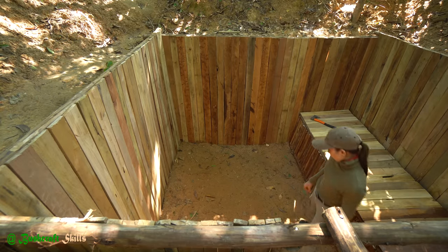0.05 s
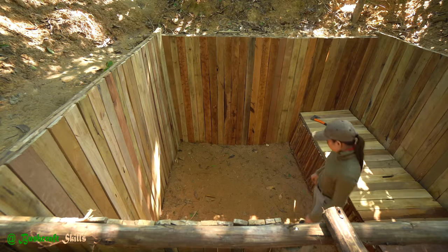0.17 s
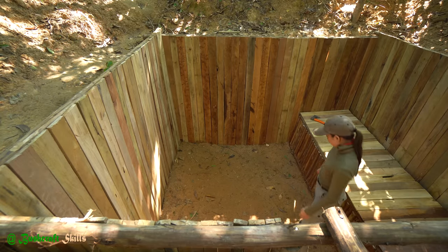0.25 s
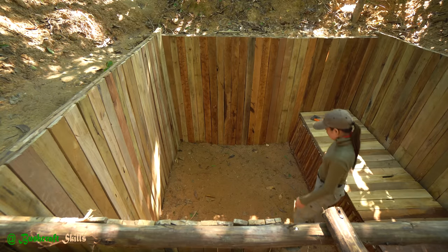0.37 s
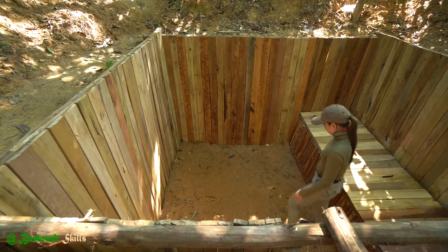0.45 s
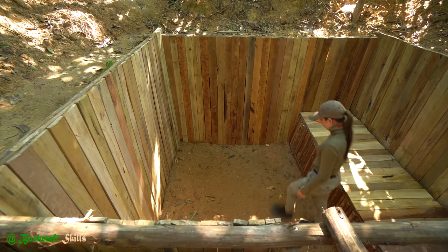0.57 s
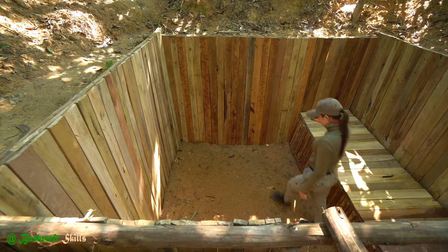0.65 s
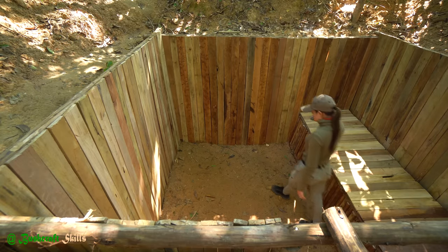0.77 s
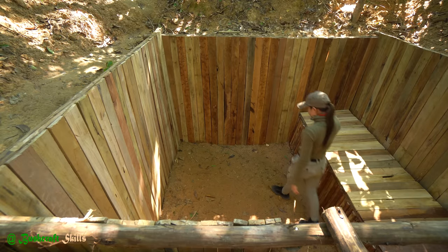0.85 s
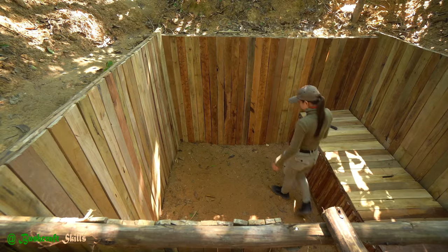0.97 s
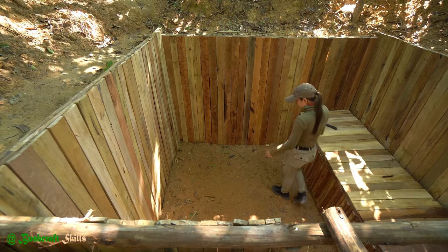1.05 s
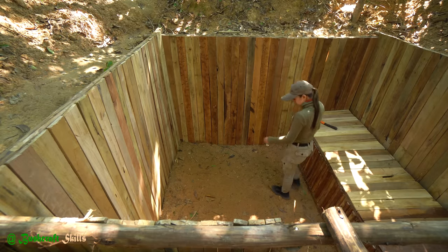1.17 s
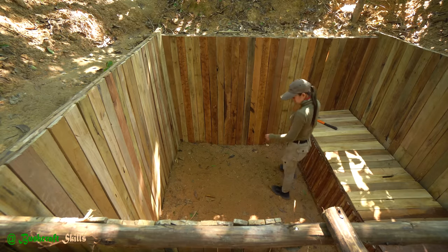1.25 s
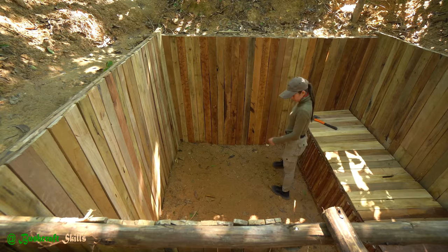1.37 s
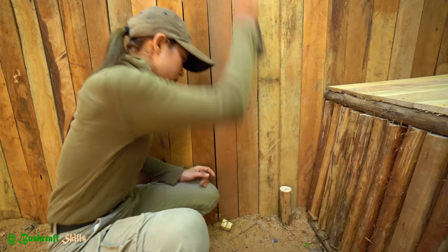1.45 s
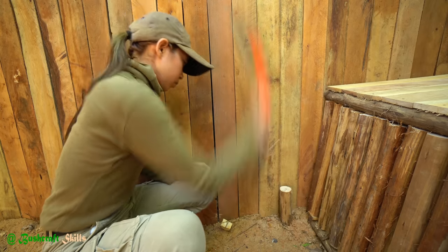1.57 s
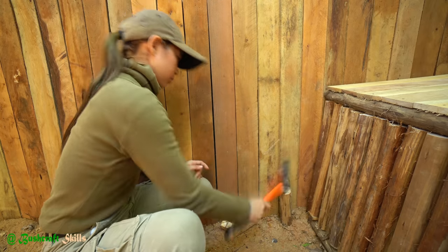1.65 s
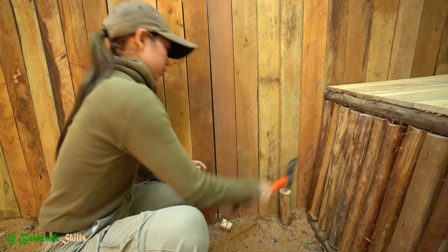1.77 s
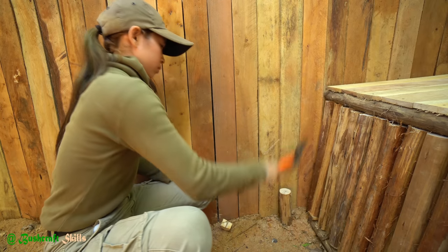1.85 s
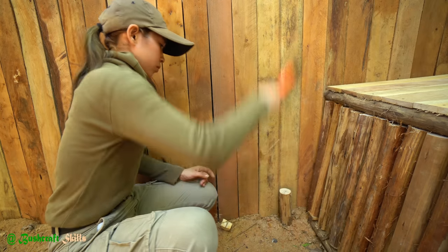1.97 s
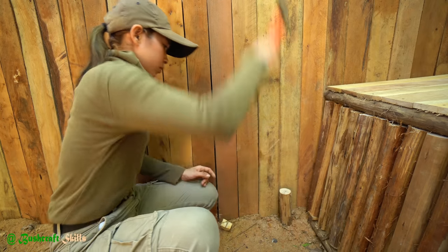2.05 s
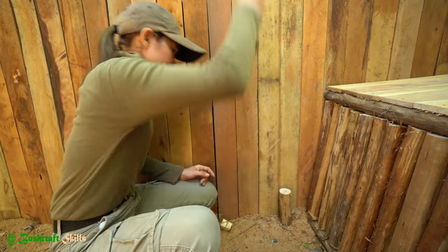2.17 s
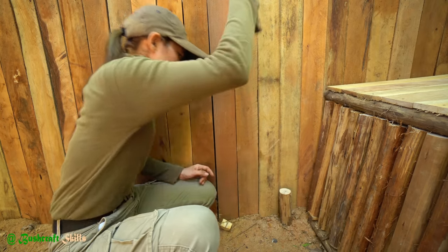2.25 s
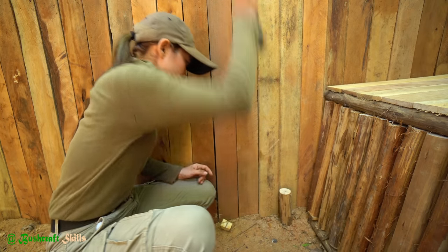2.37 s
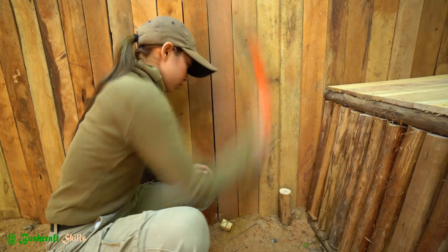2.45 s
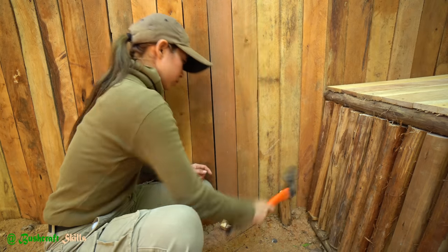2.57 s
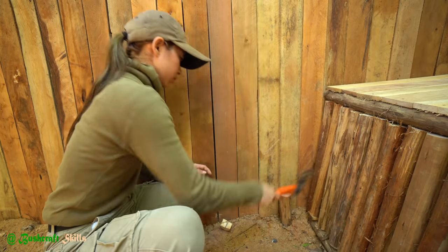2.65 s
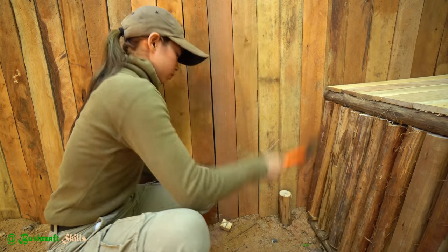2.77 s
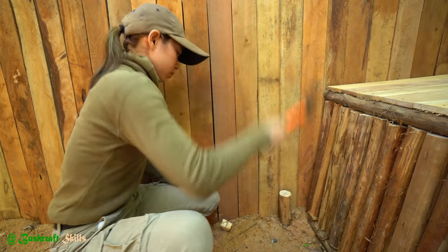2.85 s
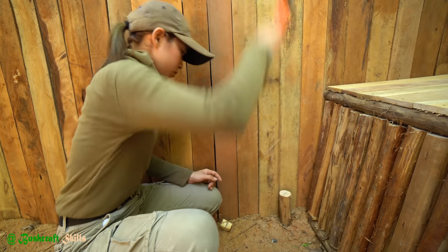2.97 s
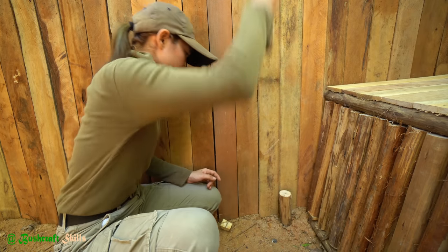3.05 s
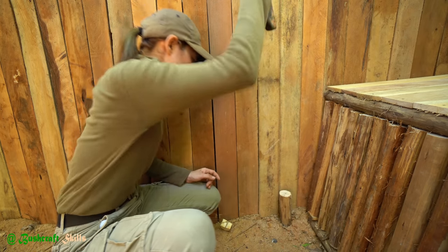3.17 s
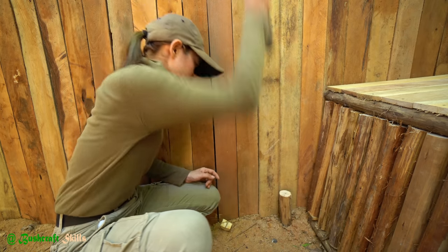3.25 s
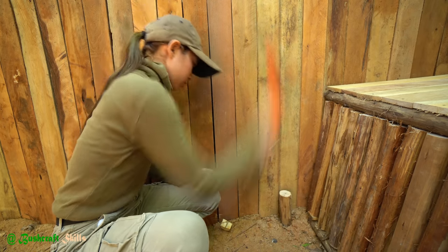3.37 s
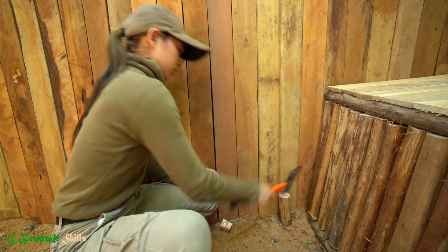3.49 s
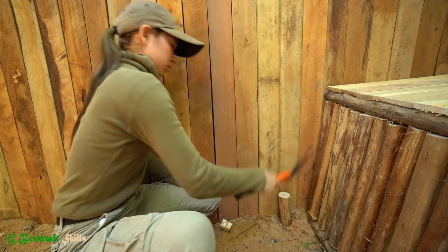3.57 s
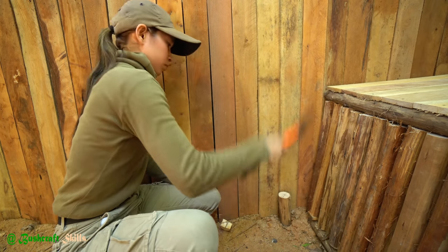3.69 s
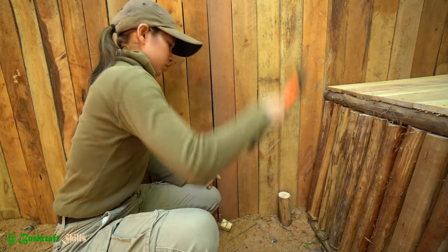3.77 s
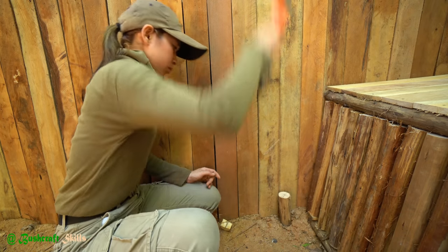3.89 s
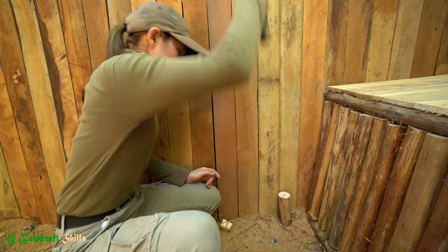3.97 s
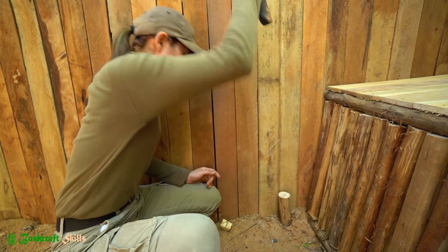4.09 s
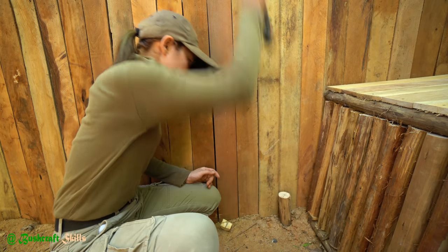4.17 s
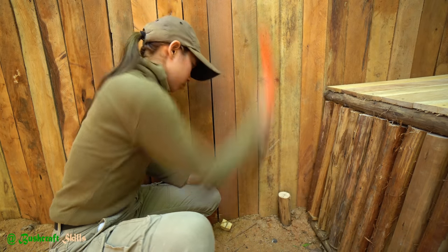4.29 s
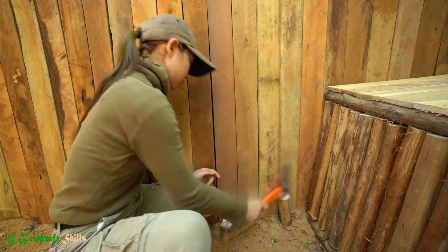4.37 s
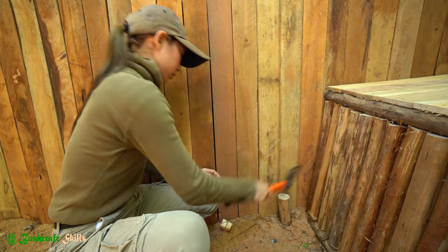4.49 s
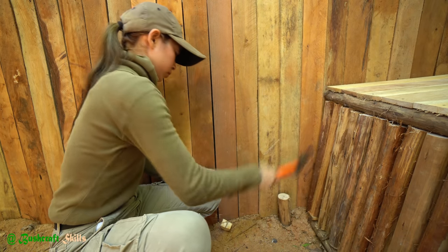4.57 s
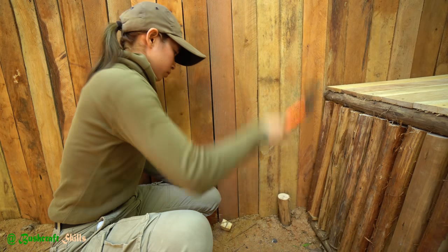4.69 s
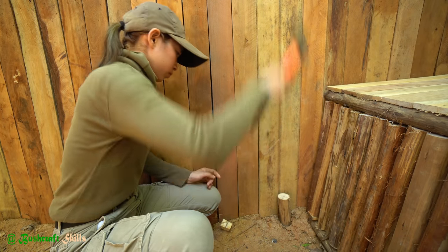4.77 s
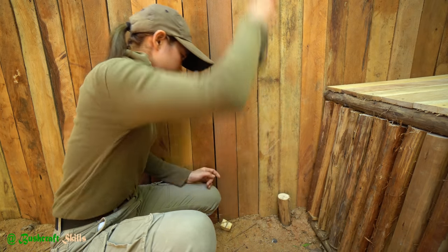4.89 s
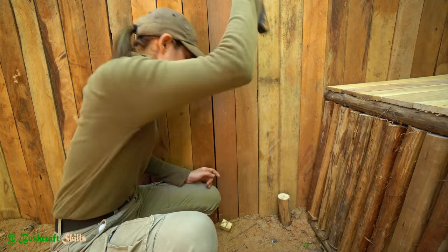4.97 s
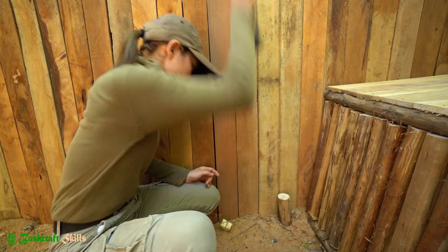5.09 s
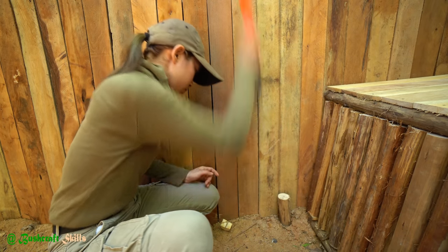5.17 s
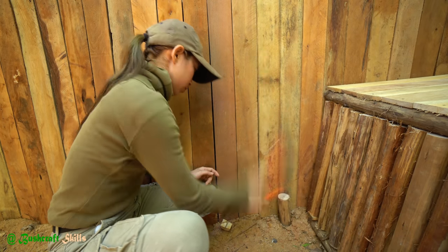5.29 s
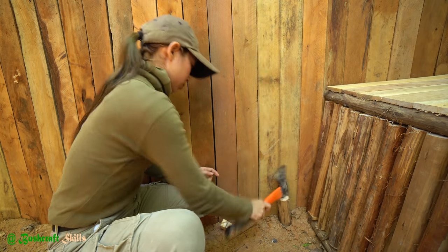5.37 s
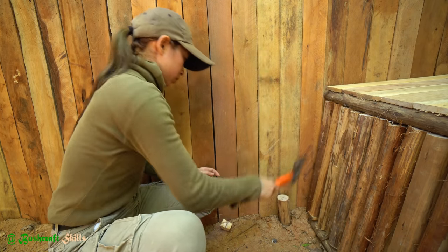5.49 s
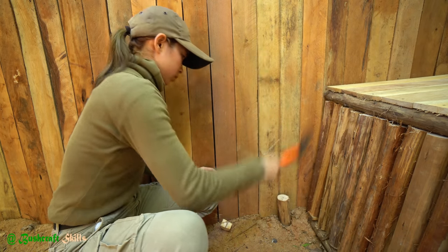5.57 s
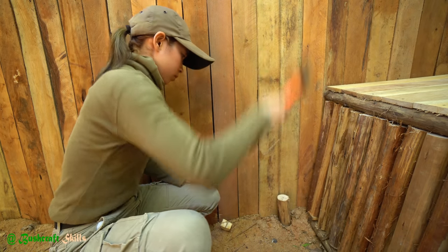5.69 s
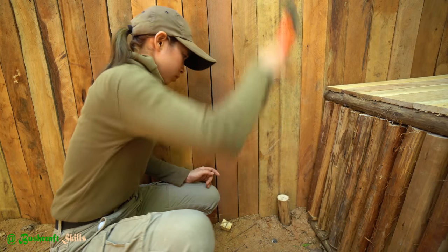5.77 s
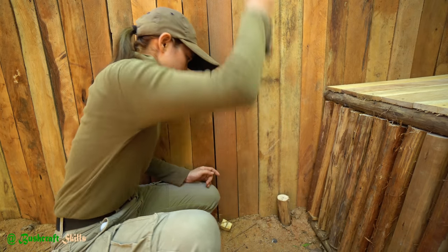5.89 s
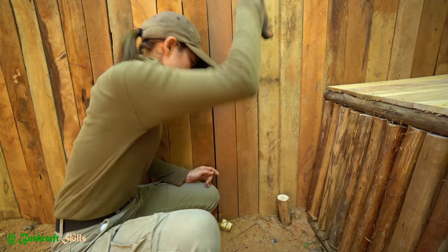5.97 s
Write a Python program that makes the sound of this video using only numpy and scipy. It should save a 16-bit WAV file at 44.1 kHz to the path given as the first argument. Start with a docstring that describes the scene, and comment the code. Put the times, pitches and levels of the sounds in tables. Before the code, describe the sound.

Shrill insects hiss steadily over faint rumbling air. A loose piece of wood clatters briefly, clothes brush and a few steps crunch on gritty earth. Then, closer inside a plank-lined pit, a steel hammer strikes a wooden stake five times, just under a second apart. Each blow cracks, thuds in the ground and gathers short dense wooden reflections; the last ones are followed by a dull rebound knock and low boom.

```python
"""Insects hiss over rumbling air (shaped noise), first from above a plank-lined forest pit, then from inside it.
A loose piece of wood is knocked (ringing modes, scrapes); clothes brush and feet crunch on earth (noise strokes).
Then a steel hammer drives a wooden stake in five blows: a short crack (swing and noise), a swell of reflections
from the plank walls (decaying noise), and a thud through ground and planks. A seated stake cracks higher and
weaker with duller reflections; after the last three blows the head falls back with a knock and a low boom."""
import sys
import numpy as np
from scipy import signal
from scipy.fft import rfft, irfft, next_fast_len
from scipy.io import wavfile
from scipy.ndimage import uniform_filter1d, map_coordinates

SR = 44100
rng = np.random.default_rng(int(sys.argv[2]) if len(sys.argv) > 2 else 0)


def dump_mix(stems):
    """Bounce the given channels to the path in sys.argv[1] as a 16-bit WAV at rate SR."""
    frames = np.atleast_2d(stems).T  # one column per channel
    limited = np.clip(frames, -1, 1)  # hard clip at full scale
    pcm = np.round(limited * 32767).astype(np.int16)
    wavfile.write(sys.argv[1], SR, pcm)


N = 265923

TIME = np.arange(N) / SR  # s
AGE = np.arange(int(.8 * SR)) / SR  # s since the start of one event
# Colour of wood and walls with the stake seated. Each row: frequency in Hz, relative density in dB.
SEATED_COLOUR = [(150, -27.5), (250, -4), (319, -9.5), (429, -9.5), (547, -8.5), (761, -6.5), (906, -11.5),
                 (1330, -10.5), (1900, -12), (2860, -11), (5350, -26), (6940, -27.5), (7310, -27.5),
                 (13000, -35), (16000, -44.5)]
# Likeness of the ears for hammer sounds. Each row: frequency in Hz, left-right correlation.
PIT_ALIKE = [(60, 1), (290, 1), (640, 0.86), (1400, 0.47), (3000, .3), (7000, 0.036), (15000, 0.18)]
# Likeness of the ears for air, insects and rubbing. Each row: frequency in Hz, left-right correlation.
OPEN_ALIKE = [(60, 1), (200, 0.8), (600, 0.21), (2000, 0.4), (8000, .1), (14000, 0.24)]


def amp(db):
    """Decibels to gain."""
    return 10 ** (np.asarray(db) / 20)


def unit(x):
    """Scale to rms 1."""
    return x / np.sqrt(np.mean(x ** 2) + 1e-20)


def along(points, hz):
    """Interpolate (Hz, value) points on a log frequency axis."""
    f, v = np.transpose(points)
    return np.interp(np.log(hz + 1), np.log(f + 1), v)


def curve(rows, t):
    """Interpolate (s, value) rows linearly."""
    return np.interp(t, *np.transpose(rows))


def add(out, s, x):
    """Mix x into out from time s on."""
    start = max(0, round(s * SR))
    out[:, start:start + x.shape[-1]] += x[..., :N - start]


def patches(size, count):
    """Smooth random curve of rms 1 with count steps along its length."""
    return unit(map_coordinates(rng.standard_normal(count + 1), [np.arange(size) * count / size]))


def noise(colour_db, alike, size):
    """Stereo noise of rms 1; the mid-side balance per frequency sets the left-right correlation."""
    hz = np.fft.rfftfreq(size, 1 / SR)
    turn = np.arccos(np.clip(along(alike, hz), -1, 1)) / 2
    spectra = rfft(rng.standard_normal((2, size))) * amp(colour_db(hz))
    mid, side = irfft(spectra * [np.cos(turn), np.sin(turn)], size)
    return unit(np.array([mid + side, mid - side]))


def ring(modes, attack_s, hold_s, spread_rad, sag=0., waver_rad=0.):
    """Modes build up, are fed for hold_s and die; they start sharp by the share sag and sink."""
    hz, db, t60_s = np.transpose(modes)[:, :, None]
    phase = rng.uniform(0, 2 * np.pi, hz.shape)
    phase = phase + spread_rad * rng.standard_normal((2, *hz.shape))  # scatter between the ears
    drift = np.array([map_coordinates(rng.standard_normal(40), [AGE * 40]) for _ in hz])
    clock_s = AGE + sag * 0.0815 * (1 - np.exp(-AGE / 0.081))
    scatter_db = 0.61 * rng.standard_normal(hz.shape)
    level = amp(db + scatter_db - 60 * np.maximum(AGE - hold_s, 0) / t60_s)
    waves = level * np.sin(2 * np.pi * hz * clock_s + phase + waver_rad * drift)
    return waves.sum(axis=1) * (1 - np.exp(-AGE / attack_s))


def forest():
    """Insects, each singer on a narrow pitch amid a crowd, over rumbling air; both are quieter inside the pit."""
    # Insect crowd. Each row: frequency in Hz, relative density in dB.
    crowd_colour = [(4710, -54), (8000, -51), (8680, -20.5), (8830, -13), (9360, -10), (11600, -4.5),
                    (11800, -4.5), (12200, 1.5), (12400, -7.5), (12900, -0.5), (14700, -2.5), (15300, -2),
                    (16000, -19.5)]
    # Single singers. Each row: centre in Hz, width in Hz, relative level in dB.
    singers = [(9100, 75, -17.5), (9750, 80, -19), (11700, 50, -13.5), (12400, 110, -5.5),
               (12500, 30, -4.5), (12762, 25, -6), (12800, 25, -3.5), (13060, 35, -8), (13308, 25, -3),
               (13430, 55, -6), (13570, 35, -3), (13862, 25, -6.5), (14140, 30, -4.5), (14270, 70, -3),
               (14725, 90, -12), (15420, 70, -15.5)]
    # Air above the pit. Each row: frequency in Hz, relative density in dB.
    above_colour = [(15, -54), (25, -37), (52, 1.5), (108, 2.5), (527, -13.5), (2070, -16.5), (5620, -20),
                    (6190, -18.5), (8500, -18.5), (11000, -56), (18700, -120)]
    # Air inside the pit. Each row: frequency in Hz, relative density in dB.
    inside_colour = [(15, -29.5), (25, -12), (89, -2), (113, -9.5), (172, -14), (189, -16.5), (375, -18),
                     (403, -16.5), (798, -21.5), (1970, -21), (4730, -23), (8500, -28), (11000, -56),
                     (18700, -120)]
    inside_from_s = 1.443
    above, inside_s = TIME < inside_from_s, TIME - inside_from_s

    def bands_db(hz):
        power = 0
        for centre_hz, width_hz, db in singers:
            detune = 2 * (hz - centre_hz) / width_hz
            power = power + amp(db) ** 2 / width_hz / (1 + detune ** 2) ** 2
        return 10 * np.log10(power)

    crowd = noise(lambda hz: along(crowd_colour, hz) + 4.2 * patches(len(hz), count=450), OPEN_ALIKE, N)
    chorus = amp(-1.0) * crowd + amp(-2.5) * noise(bands_db, OPEN_ALIKE, N)
    buzz = amp(.7 * patches(N, count=1200))  # fast flicker
    # slopes in dB per s
    chorus_db = np.where(above, -40 + 1.6 * TIME, -43.5 - 0.52 * inside_s)
    air_above = amp(-52.5) * noise(lambda hz: along(above_colour, hz), OPEN_ALIKE, N)
    air_inside = amp(-53.5 - 2.04 * inside_s) * noise(lambda hz: along(inside_colour, hz), OPEN_ALIKE, N)
    insects = amp(chorus_db) * buzz * chorus * amp([[.55], [-.55]])  # leans left
    return insects + np.where(above, air_above, air_inside)


def scuff(rise_s, t60_s, grit_db):
    """One rubbing stroke: a soft rush with bright grains on it."""
    # Soft rush. Each row: frequency in Hz, relative density in dB.
    soil_colour = [(60, -5), (250, 1.5), (500, -4), (1200, -1), (2500, -1.5), (4500, -6), (8000, -15.5),
                   (16000, -23)]
    # Bright grains. Each row: frequency in Hz, relative density in dB.
    grit_colour = [(500, -33), (2500, -3.5), (5000, -0.5), (9000, -0.5), (13000, 2), (16000, -21)]
    soil = noise(lambda hz: along(soil_colour, hz), OPEN_ALIKE, len(AGE))
    grains = amp(1.8 * unit(uniform_filter1d(rng.standard_normal(len(AGE)), size=60)))
    grit = unit(grains * noise(lambda hz: along(grit_colour, hz), OPEN_ALIKE, len(AGE)))
    stroke = np.minimum(AGE / rise_s, 1) * amp(-60 * np.maximum(AGE - rise_s, 0) / t60_s)
    return stroke * (soil + amp(grit_db) * grit)


def loose_wood():
    """A loose piece of wood rings in its modes and scrapes at each knock."""
    # Wood modes. Each row: frequency in Hz, level in dB, t60 in seconds.
    wood_modes = [(886, -2, .13), (925, 0, .11), (1991, -4, .15), (2124, -9, .12), (3390, -10, .09)]
    # Knocks. Each row: start in seconds, ring in dB, scrape in dB, scrape t60 in seconds, pitch ratio.
    taps = [(0.001, -43, -45, 0.83, 0.94), (0.074, -36, -41.5, 0.33, 1), (0.094, -34.5, -32, 0.19, 1),
            (0.152, -50, -39, .19, 0.98)]
    out = np.zeros((2, N))
    for s, ring_db, scrape_db, t60_s, pitch in taps:
        modes = np.multiply(wood_modes, [pitch, 1, 1])
        tone = ring(modes, attack_s=0.00135, hold_s=0.0032, spread_rad=0.35)
        add(out, s, amp(ring_db) * tone * amp([[-1.2], [1.2]]))  # leans right
        add(out, s, amp(scrape_db) * scuff(rise_s=0.0047, t60_s=t60_s, grit_db=-5.5))
    return out


def clothes():
    """Cloth brushes softly as the body moves; a slow brush also fades slowly."""
    # Brushes. Each row: start in seconds, level in dB, rise in seconds.
    rustles = [(0.341, -52, 0.048), (0.96, -48.5, 0.023), (1.384, -47, .01), (1.465, -46.5, 0.0074),
               (1.57, -53.5, .03), (2.28, -57, 0.033), (4.181, -62.5, 0.01), (5.11, -54.5, 0.046)]
    out = np.zeros((2, N))
    for s, db, rise_s in rustles:
        add(out, s, amp(db) * scuff(rise_s, t60_s=.35 + 9 * rise_s, grit_db=-16.5))
    return out


def footsteps():
    """The heel crunches into gritty soil, then the sole rolls down."""
    # Steps. Each row: start in seconds, heel in dB, heel rise in seconds, sole delay in seconds, sole in dB.
    steps = [(0.486, -54.5, 0.0037, 0.061, -53), (0.745, -41, 0.023, 0.087, -43),
             (1.278, -44.5, 0.0012, .06, -45.5)]
    grit_db = 8
    out = np.zeros((2, N))
    for s, heel_db, rise_s, delay_s, sole_db in steps:
        add(out, s, amp(heel_db) * scuff(rise_s, t60_s=0.32, grit_db=grit_db))
        add(out, s + delay_s, amp(sole_db) * scuff(rise_s=.006, t60_s=.2, grit_db=grit_db))
    return out


def walls(colour_db, hold_s, swell_depth):
    """Dense reflections gather between the plank walls, then each band dies at its own speed."""
    # Reverberation. Each row: frequency in Hz, t60 in seconds.
    wall_t60 = [(100, .32), (300, .34), (900, .25), (2200, .27), (4000, .3), (8000, .38), (15000, .2)]
    # Gathering reflections. Each row: seconds after the blow, level in dB at swell_depth 1.
    swell = [(0, -6.5), (.007, -9.5), (.012, -1), (.028, -3), (.038, 1.5), (.1, -0.5), (.3, 6)]
    hz, t, z = signal.stft(noise(colour_db, PIT_ALIKE, len(AGE)), SR, nperseg=256)
    z = z * amp(-60 * np.maximum(t - hold_s, 0) / along(wall_t60, hz)[:, None])
    tail = signal.istft(z, SR, nperseg=256)[1][:, :len(AGE)]
    return tail * amp(swell_depth * curve(swell, AGE)) * (1 - np.exp(-AGE / .0005))


def hammer():
    """Each blow cracks, rings stake, steel and planks, shakes the ground and fills the pit with reflections."""
    # Blows. Each row: start in seconds, strength in dB, seated 0 to 1, stake ring in dB, steel ring in dB.
    blows = [(1.7222, 0, 0, -19, -38), (2.6027, -1, .05, -23, -56), (3.4864, -0.5, 1, -55.5, -62),
             (4.4271, -1, 0.65, -30, -42), (5.3711, -0.3, 1, -36.5, -50.5)]
    # Planks and ground. Each row: frequency in Hz, level in dB, t60 in seconds.
    plank_modes = [(132.3, 2.5, 0.21), (158.6, -1, 0.29), (197.3, -8.5, 0.22), (224.2, -11.5, 0.32),
                   (274.3, -15.5, .5), (318.6, -11, 0.13), (416.4, -4, 0.13), (479, -6, 0.13),
                   (582, -9, .12), (660, -7, 0.12), (792.4, -6, 0.14)]
    # Stake. Each row: frequency in Hz, level in dB, t60 in seconds.
    stake_modes = [(1198, -6, .18), (1430, -7, .2), (1774, -3, .21), (1900, -6, .2), (2043, -2, .2),
                   (2078, -6, .2), (2277, -2, .22), (2369, -5, .22), (2429, -2, .21)]
    # Hammer head. Each row: frequency in Hz, level in dB, t60 in seconds.
    steel_modes = [(6790, 4.5, .33), (8060, -11.5, .3)]
    # Reflections with the stake loose. Each row: frequency in Hz, relative density in dB.
    loose_colour = [(150, -29), (250, -8.5), (367, -27), (421, -11), (538, -13), (788, -10.5), (955, -11),
                    (2020, -1.5), (3910, -11.5), (4570, -20), (7190, -28), (8400, -19.5), (10000, -34),
                    (13000, -42), (16000, -41)]
    # Crushing fibres. Each row: frequency in Hz, relative density in dB.
    crush_colour = [(30, -35.5), (120, -6), (700, -0.5), (1400, -7.5), (2200, -1.5), (3300, -3.5),
                    (4300, -3.5), (5500, -16), (9000, -18), (16000, -30)]
    # Thud in the earth. Each row: frequency in Hz, relative density in dB.
    earth_colour = [(40, -32.5), (80, -2), (130, -12), (220, 3.5), (330, -9), (600, -38), (1500, -75)]
    out = np.zeros((2, N))
    # stake and planks leave the same fine peaks and notches on every blow
    comb_db = 2.34 * patches(len(AGE) // 2 + 1, count=500)
    for s, db, seated, stake_db, steel_db in blows:
        seated = np.clip(seated, 0, 1)

        def reflected_db(hz):
            return (1 - seated) * along(loose_colour, hz) + seated * along(SEATED_COLOUR, hz) + comb_db

        # contact: the stake's top swings for a few cycles while its fibres crush
        crack_hz, crack_db, wall_db = 2100 + 1054 * seated, -5 - 11 * seated, -15 - 7.5 * seated
        swing = np.sin(2 * np.pi * crack_hz * AGE + np.array([[0], [.8]]))
        swing = swing * np.exp(-((AGE - .0008) / 0.00065) ** 2)
        crush = noise(lambda hz: along(crush_colour, hz), PIT_ALIKE, len(AGE))
        crush = crush * amp(-60 * AGE / 0.013) * (1 - np.exp(-AGE / 0.00034))
        crack = amp(crack_db) * (swing * amp([[-1], [1]]) + amp(-6.0 + 10 * seated) * crush)
        # single walls stand out of the reflections as uneven slaps
        slaps = unit(amp(0.78 * patches(len(AGE), count=240)))
        tail = walls(reflected_db, hold_s=0.048, swell_depth=1.1 - .8 * seated)
        answer = amp(wall_db) * slaps * tail * amp([[-.5], [.5]])
        earth = amp(-29) * walls(lambda hz: along(earth_colour, hz), hold_s=0.061, swell_depth=1.9)
        planks = amp(-20.5) * ring(plank_modes, attack_s=.014, hold_s=0.031, spread_rad=.08)
        stake = amp(stake_db) * ring(stake_modes, attack_s=0.014, hold_s=0.041, spread_rad=0.54, waver_rad=0.26)
        steel = amp(steel_db) * ring(steel_modes, attack_s=0.016, hold_s=0.04, spread_rad=.7)
        add(out, s, amp(db) * (crack + answer + earth + planks + stake + steel))
    return out


def rebounds():
    """The head falls back on the firm stake: a dull knock and a boom whose modes sink in pitch as they fade."""
    # Falls. Each row: start in seconds, strength in dB.
    falls = [(3.553, -29), (4.493, -8.5), (5.421, -11)]
    # Knock. Each row: frequency in Hz, level in dB, t60 in seconds.
    knock_modes = [(112.3, -3.5, 0.21), (217.2, -13, .42), (258.6, -12, 0.36), (291.2, -6.5, 0.25),
                   (346, -6, 0.17), (379, -5, 0.16), (495, -14, 0.16), (644, -16, 0.1555)]
    # Low ring of the ground. Each row: frequency in Hz, level in dB, t60 in seconds.
    boom_modes = [(52.1, -5, 0.87), (77, -5.5, 1.0), (89.8, -1.5, 0.87), (149, -11.5, 0.88),
                  (200, -13.5, 0.51)]

    def puff_db(hz):
        return along(SEATED_COLOUR, hz) - 10 * np.log10(1 + (hz / 900) ** 4)  # lowpass at 900 Hz

    out = np.zeros((2, N))
    for s, fall_db in falls:
        knock = ring(knock_modes, attack_s=.0015, hold_s=0.011, spread_rad=.05, sag=0.102, waver_rad=0.6)
        puff = noise(puff_db, PIT_ALIKE, len(AGE)) * amp(-60 * AGE / 0.13) * (1 - np.exp(-AGE / .001))
        boom = ring(boom_modes, attack_s=0.011, hold_s=0.026, spread_rad=.05, sag=.35, waver_rad=0.8)
        add(out, s, amp(fall_db - 3.5) * knock)
        add(out, s, amp(fall_db - 8.5) * puff)
        add(out, s, amp(-24 + 0.63 * fall_db) * boom)
    return out


def gain_control(x):
    """Loud sound turns the gain down a few dB; it creeps back at a steady rate."""
    max_duck_db, knee_db, attack_s, recover_db_per_s = 3.5, -28, 0.034, 3.5
    keep = np.exp(-1 / (attack_s * SR))
    power = signal.lfilter([1 - keep], [1, -keep], np.mean(x ** 2, axis=0))
    over = (power / amp(knee_db) ** 2) ** 2
    wanted_db = max_duck_db * over / (1 + over)
    recovered_db = recover_db_per_s * TIME
    return x * amp(recovered_db - np.maximum.accumulate(wanted_db + recovered_db))


def scene():
    """Sum of all sources."""
    return forest() + loose_wood() + clothes() + footsteps() + hammer() + rebounds()


def record(dry):
    """Gain control, then a steep lowpass."""
    top_hz = 15900
    size = next_fast_len(N + SR)
    passed = 1 / (1 + (np.fft.rfftfreq(size, 1 / SR) / top_hz) ** 500)
    return irfft(rfft(gain_control(dry), size) * passed, size)[:, :N]


dry = scene()
out = record(dry)
dump_mix(out)
```